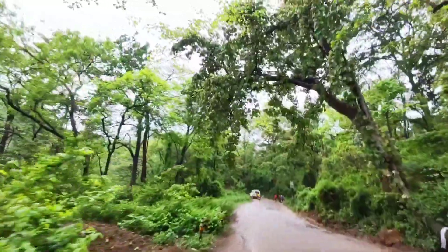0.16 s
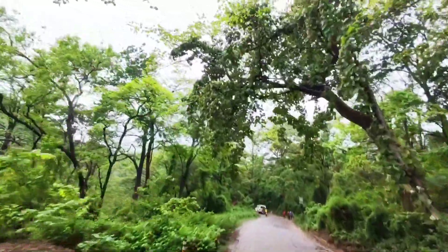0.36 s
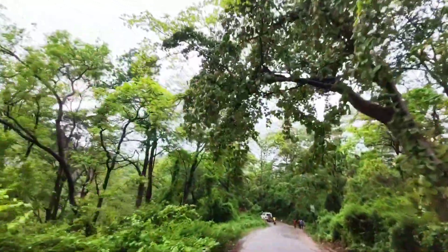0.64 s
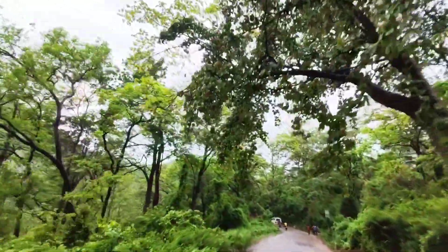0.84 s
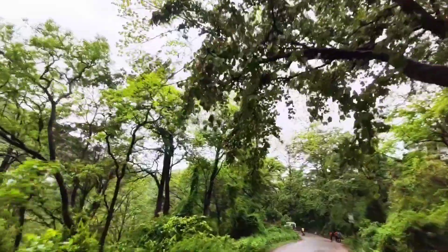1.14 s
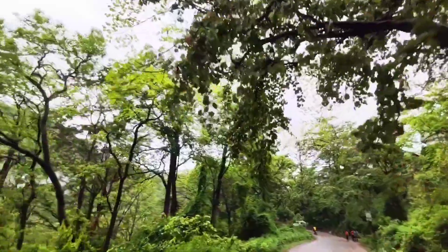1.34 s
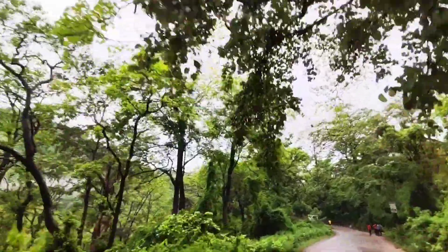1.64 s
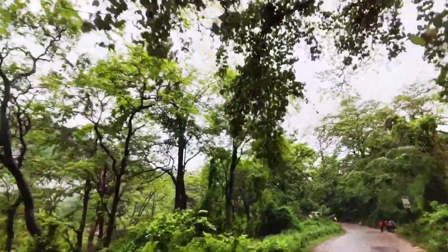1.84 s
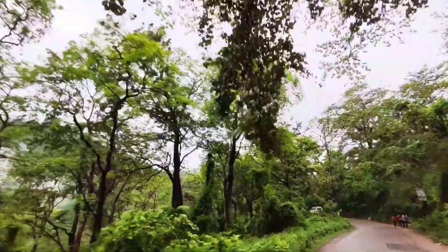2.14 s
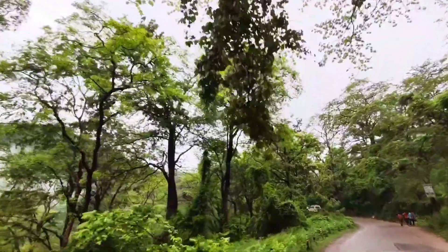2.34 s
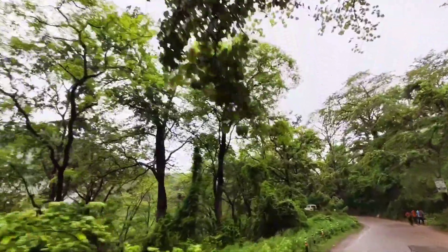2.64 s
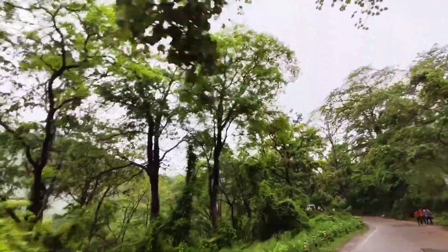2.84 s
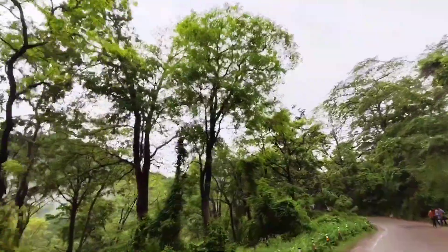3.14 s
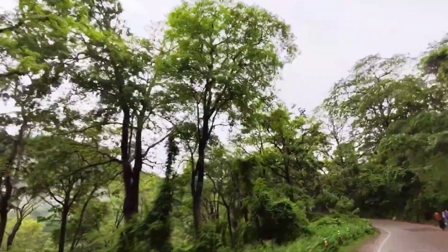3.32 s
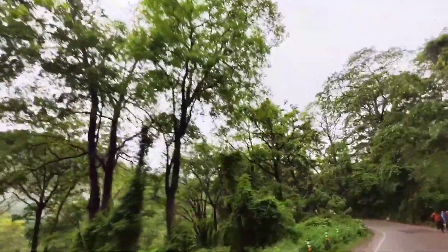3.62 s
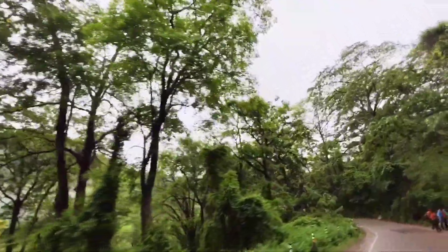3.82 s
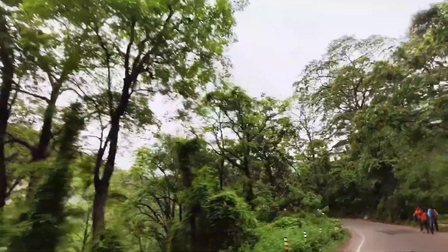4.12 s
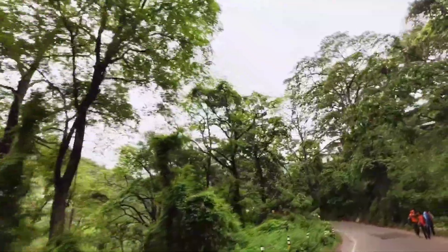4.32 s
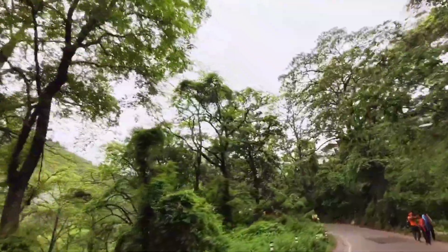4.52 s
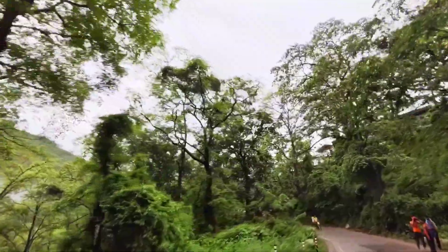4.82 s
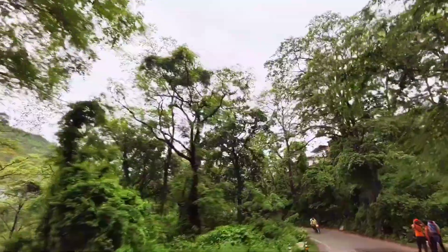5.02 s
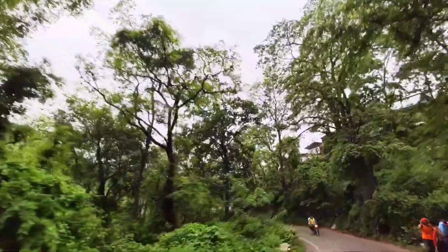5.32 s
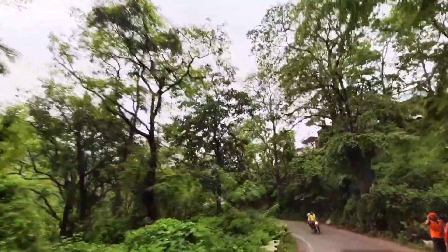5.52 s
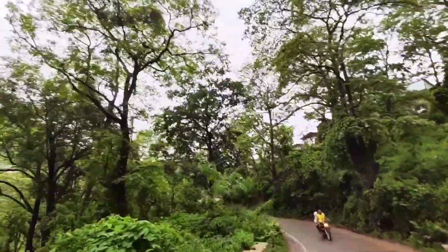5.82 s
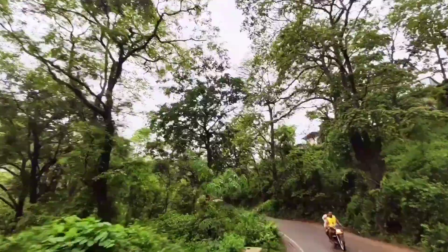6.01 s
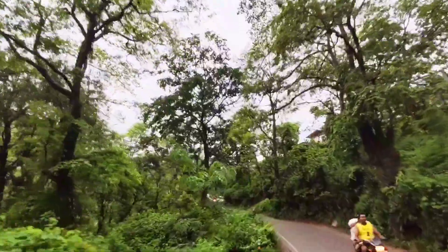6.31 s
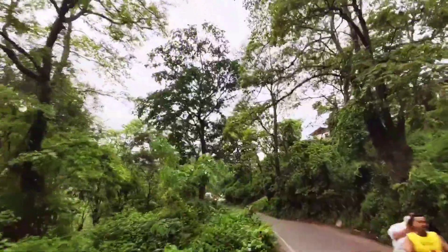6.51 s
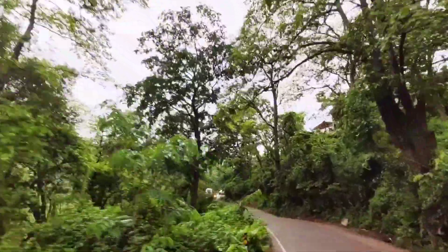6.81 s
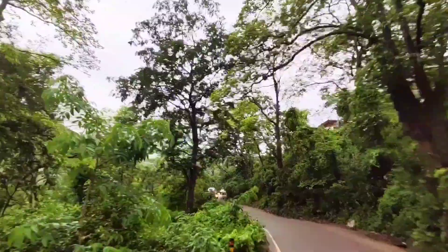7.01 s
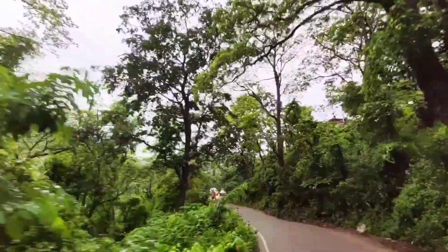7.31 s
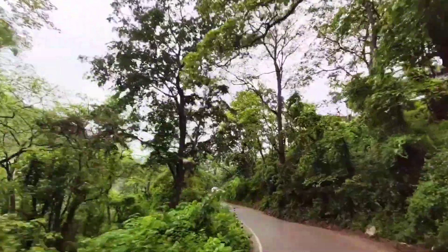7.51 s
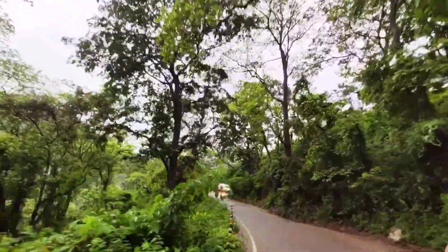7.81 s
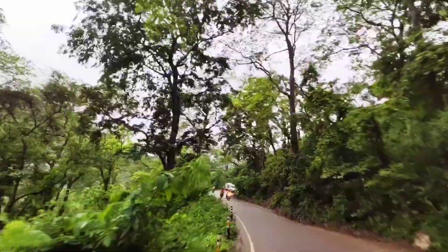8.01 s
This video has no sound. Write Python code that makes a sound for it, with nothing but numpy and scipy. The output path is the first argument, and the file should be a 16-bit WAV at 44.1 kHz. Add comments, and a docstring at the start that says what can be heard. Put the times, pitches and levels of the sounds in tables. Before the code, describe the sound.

Gusty wind buffets the microphone over a running scooter engine while an approaching motorbike toots repeatedly, and the scooter honks back.

```python
"""A scooter ride along a forest road. From the start, wind buffets two microphone ports over engine
clatter and gear whine that climbs with speed. An oncoming motorbike toots its electric disc horn,
faint at first, then closer, and the trees throw it back lower. Around 5.5 s the rider eases off and
lets it pass with two short toots. The throttle opens again through hard gusts, the intake rasps,
and at 7.8 s the scooter sounds its own horn, whose echoes come back higher."""
import sys
import numpy as np
from scipy import signal
from scipy.fft import rfft, irfft, next_fast_len
from scipy.io import wavfile
from scipy.ndimage import uniform_filter1d, minimum_filter1d

SR = 44100
rng = np.random.default_rng(int(sys.argv[2]) if len(sys.argv) > 2 else 0)


def int16_out(signal):
    """Quantize to a 16-bit WAV file."""
    q = np.round(np.clip(np.atleast_2d(signal).T, -1, 1) * 32767)
    wavfile.write(sys.argv[1], SR, q.astype(np.int16))


N = 359415
TIME = np.arange(N) / SR

# The steady bed of air: left port, then right port, in dB.
STEADY_AIR_DB = (-20.5, -21.5)
# Gusts and lulls. Each row: middle in seconds, half length in seconds, change in dB, port (0 left, 1 right).
GUSTS = [(0.29, 0.029, 10.5, 0), (0.573, 0.091, -8, 0), (1.495, 0.46, -3, 1), (1.563, 0.08, 3.5, 0),
         (2.495, 0.038, 4, 1), (2.598, 0.046, 3, 0), (4.02, 0.28, 2.5, 0), (3.85, 0.19, 4, 1),
         (4.207, 0.12, 5.5, 1), (4.563, 0.046, 9.5, 1), (4.929, 0.15, -8, 1), (5.411, .1, 13.5, 1),
         (5.679, 0.12, -11, 1), (6.04, 0.15, 1.5, 1), (6.142, 0.053, 4.5, 0), (6.436, 0.18, -7, 1),
         (6.457, 0.099, -5.5, 0), (6.942, .17, 11, 1), (7.06, 0.16, 9.5, 0), (7.542, 0.29, 2, 1),
         (7.628, 0.091, -3.5, 0), (8.06, 0.11, 5.5, 0), (7.96, 0.051, 3.5, 1)]
def airflow():
    """Strength of the air on each port in dB: steady, with gusts and lulls that swell and pass."""
    flow_db = np.outer(STEADY_AIR_DB, np.ones(N))
    for middle, half_length, db, port in GUSTS:
        flow_db[port] += db * np.exp(-np.abs((TIME - middle) / half_length) ** 3)
    return flow_db


# The low body of the wind. Each row: frequency in Hz, relative level in dB.
BUFFET_COLOUR = [(20, -35), (50, -35), (70, -20), (95, -4.5), (135, 2.5), (200, -4), (330, -4.5),
                 (450, -10), (700, -26), (1200, -32), (3000, -74)]
# The rasp of turbulence torn off by eddies. Each row: frequency in Hz, relative level in dB.
RASP_COLOUR = [(150, -11.5), (400, 0), (650, 1), (850, -7), (1300, -16.5), (5000, -53)]
def wind(airflow_db, trim_db=-0.5, flutter_db=3.0, rasp_db=-17, surge_db=1.43):
    """Turbulence surges and flutters on each port by itself; stronger swirls sound brighter."""
    ports = []
    for flow_db in airflow_db + surge_db * np.array([walk(13), walk(15)]):
        swirl = undb(flutter_db * walk(70))
        rasp = undb(rasp_db + .5 * (flow_db - np.mean(flow_db))) * unit(swirl ** 2) * noise(RASP_COLOUR)
        buffet = unit(swirl) * noise(BUFFET_COLOUR)
        ports.append(undb(flow_db + trim_db) * (buffet + rasp))
    return np.array(ports)


EDDY_S, EDDY_HZ = .017, 250.6  # length and pitch of a typical eddy
# The knock of a fast eddy. Each row: frequency in Hz, relative level in dB.
KNOCK_COLOUR = [(200, -1), (520, 3.5), (850, 2.5), (1600, -13), (3500, -44)]
# The hardest hits of air. Each row: middle in seconds, level in dB, pitch in Hz, port (0 left, 1 right).
HARD_EDDIES = [(.204, -9.5, 234, 0), (.282, -5, 220.4, 0), (.995, -16, 305, 0), (1.486, -11, 267, 0),
               (1.512, -7.5, 232, 0), (1.531, -2.5, 135, 0), (1.578, -11, 280, 0), (1.605, -5, 265, 0),
               (1.863, -2, 340.4, 0), (1.905, -9.5, 198, 0), (2.291, -5.5, 188, 0), (2.482, -6, 124, 1),
               (2.549, -13, 167, 1), (2.597, -11.5, 172.6, 0), (2.858, -10, 287, 0), (2.929, -8.5, 227, 0),
               (3.118, -8.5, 167.9, 0), (3.162, -10, 194, 0), (3.342, -3, 288.4, 0), (3.344, -11, 317.6, 1),
               (3.394, -10.5, 316.4, 1), (3.494, -9.5, 189, 0), (3.604, -8.5, 183, 1), (3.626, -6, 284, 0),
               (4.063, -8.5, 277.1, 0), (4.149, -9, 274, 1), (4.183, -9.5, 243.5, 0),
               (4.213, -10, 320.9, 1), (4.449, -8, 278, 0), (4.571, 0, 266.8, 1), (4.875, -9.5, 302.1, 0),
               (5.1, -6.5, 380, 0), (5.248, -10.5, 224, 0), (5.255, -10, 171.7, 1), (5.375, 0, 237.4, 1),
               (5.476, -8, 202.5, 1), (5.492, -9.5, 246.5, 0), (5.648, -21.5, 424, 0), (5.721, -11, 410, 0),
               (5.762, -9.5, 198, 0), (5.986, -10, 192, 0), (6.005, -13, 140, 1), (6.085, -6, 324.7, 0),
               (6.15, -12, 292.5, 1), (6.157, -7.5, 272, 0), (6.226, -10, 243.5, 0), (6.593, -13.5, 252, 0),
               (6.778, -4.5, 149.4, 0), (6.816, -4, 160, 1), (6.848, -1, 150, 1), (6.891, -2, 228, 1),
               (6.956, 1, 290.7, 1), (7.003, -6, 360, 1), (7.019, -13, 429, 0), (7.02, -13, 459, 1),
               (7.038, -4, 298.5, 0), (7.074, -2, 254, 1), (7.082, -7, 260, 0), (7.17, -1, 356.4, 0),
               (7.19, -7.5, 251, 0), (7.336, -9, 211.6, 0), (7.351, -10, 264, 1), (7.477, -12.5, 233, 0),
               (7.756, -6.5, 164.4, 1)]
def eddies(airflow_db, wander=0.5534, trail_db=-18, knock_db=-15, knock_half_s=0.0047):
    """Each eddy shakes one port for a few uneven cycles; faster ones knock and trail more turbulence."""
    out, rasp, burst = np.zeros((2, N)), noise(RASP_COLOUR), noise(KNOCK_COLOUR)
    bend = np.exp(wander * np.tanh(walk(650)) - wander ** 2 / 2)
    for middle, db, hz, port in HARD_EDDIES + chance_eddies(airflow_db):
        near = slice(max(int((middle - 2 * EDDY_S) * SR), 0), int((middle + 2 * EDDY_S) * SR))
        phase = rng.random() + np.cumsum(hz * bend[near]) / SR
        age = TIME[near] - middle
        swirl = np.sqrt(2) * np.sin(2 * np.pi * phase) * np.exp(-(age / (0.56 * EDDY_S)) ** 2)
        trail = rasp[near] * np.exp(-(age / (0.61 * EDDY_S)) ** 2) * undb(trail_db)
        knock = burst[near] * np.exp(-(age / knock_half_s) ** 2) * undb(knock_db)
        out[port, near] += undb(db) * (swirl + (trail + knock) * (hz / EDDY_HZ) ** 3.06)
    return out


def chance_eddies(airflow_db, count=50, pitch_spread=0.34):
    """Rows for weaker eddies that come by chance, each as strong as the air on its port."""
    rows = []
    for when, pitch, side in rng.random((count, 3)):
        at, port = int(when * N), int(side > .5)
        hz = EDDY_HZ * np.exp(pitch_spread * (2 * pitch - 1))
        rows.append((TIME[at], airflow_db[port, at], hz, port))
    return rows


# The horn's timbre; skipped harmonics lie in between. Each row: harmonic number, relative level in dB.
HORN_HARMONICS = [(1, -25), (3, -44), (7, -44), (8, -21.5), (9, -1), (10, -38), (12, -64), (13, -34.5),
                  (14, -49), (18, -70), (21, -48), (22, -39), (23, -31.5), (24, -46), (26, -48), (28, -46),
                  (33, -52)]
def horn_cycle(size=2048, leaf_loss_db=0.4):
    """One cycle each of ring, buzz and dulled buzz: the armature strikes its pole, the disc rings."""
    turn = np.arange(size) / size
    multiples, levels = np.transpose(HORN_HARMONICS)
    orders = np.arange(1, 37)
    gains = undb(np.interp(orders, multiples, levels))
    partials = gains[:, None] * np.sin(2 * np.pi * orders[:, None] * turn)
    ring = np.argmax(gains)  # the disc's note, the ninth harmonic
    disc = partials[ring]
    # Leaves swallow more of each harmonic above the disc's.
    through_leaves = undb(-leaf_loss_db * np.maximum(orders - orders[ring], 0))
    return disc, partials.sum(axis=0) - disc, through_leaves @ partials - disc


# Bright hiss for horn sizzle, tyres and air. Each row: frequency in Hz, relative level in dB.
HISS_COLOUR = [(2000, 5), (4000, 6.5), (5500, 5), (6600, -1), (7400, -19), (8300, -2.5), (9500, 1.5),
               (10800, -1), (11900, 3), (14400, -5)]
# Bushes on the bend screen the motorbike for a moment. Each row: time in seconds, gain in dB.
BUSH_SCREEN = [(5.02, 0), (5.12, -4.5), (5.23, -4.5), (5.3, 0)]
# Six toots from the motorbike, then the scooter's own. Each row: start and end in seconds, pitch in Hz,
# swell in seconds, direct level in dB, tree echo in dB, sizzle in dB against the direct sound,
# Doppler ratio of far echoes, left minus right in dB, buzz in dB, growth in dB per second,
# flutter in dB, hillside echo in dB.
TOOTS = [ (-.3, .38, 428.5, .05, -47, -42.5, -26, .968, -7, -3, 5, 4, -46),
         (.65, 1.5, 445, .1, -53, -45, -26, .972, -6, -3, 0, 4, -50),
         (1.91, 2.86, 428.6, .022, -34, -33.5, -19, .963, -4, -2, -1, 4, -39),
         (4.508, 5.705, 431.3, .008, -23.6, -27.8, -29, .96, -2, -2.5, 1.2, 2.2, -38),
         (5.917, 6.095, 432.7, .005, -18, -23.5, -22, .96, -1, 4.5, -14, 2, -33),
         (6.208, 6.42, 431.8, .004, -23.3, -24, -16, .964, -2, 7, 12, 2.3, -33),
         (7.812, 8.3, 392, .002, -31, -21.5, -10, 1.047, -7, 2, -6, 3, -33), ]
def horns(trees=48, far_s=.4, echo_t60=1.5, bend_s=.05, scatter=.008, hillside_s=.09,
          creep_hz_per_s=1.9, release_s=0.0045, rattle_db=8):
    """Electric disc horns; trees and hillside return each toot late, dull and Doppler-shifted."""
    disc, buzz, dull_buzz = horn_cycle()
    rattle = unit(undb(rattle_db * np.tanh(walk(130))))
    waver = 1 + .0003 * walk(40) + 0.0026 * walk(900)
    drift = 0.002507 * walk(16)
    out, hiss = np.zeros((2, N)), np.array([noise(HISS_COLOUR), noise(HISS_COLOUR)])

    def toot(start, end, hz, swell, growth, rasp, port_phases, echo=True):
        """Span and sound of one toot: it starts sharp, settles, creeps up and rings out; echoes drift."""
        span = slice(int(np.clip(start * SR, 0, N)), int(np.clip((end + 0.057) * SR, 0, N)))
        age = np.maximum(TIME[span] - start, 0)
        shift = waver[span] + echo * drift[rng.integers(N // 2):][:len(age)]
        settle = 1 + 0.0071 * np.exp(-age / 0.012)
        phase = np.cumsum((hz + creep_hz_per_s * age) * shift * settle) / SR
        attack = np.sqrt(1 - np.exp(-age / (2 * swell)))
        release = np.exp(-np.maximum(TIME[span] - end, 0) / release_s)
        place = (np.add.outer(port_phases, phase) * len(disc)).astype(int) % len(disc)
        tone = (disc[place] + rattle[span] * rasp[place]) / np.std(disc)
        return span, attack * release * undb(growth * age) * tone

    def flutter(db):
        """Fading at the two ports as trunks and leaves go by."""
        return unit(undb(db * (np.array([walk(24), walk(21)]) + walk(15)) / np.sqrt(2)))

    for (start, end, hz, swell, direct_db, echo_db, sizzle_db, doppler,
         side_db, buzz_db, growth, flutter_db, hillside_db) in TOOTS:
        heard = np.zeros((2, N))
        near_buzz, far_buzz = buzz * undb(buzz_db), dull_buzz * undb(buzz_db / 2)
        span, direct = toot(start, end, hz, swell, growth, near_buzz, [0, .025], echo=False)
        sizzle = np.abs(direct) * hiss[:, span] * undb(sizzle_db)
        heard[:, span] += (direct * flutter(flutter_db)[:, span] + sizzle) * undb(direct_db)
        span, slap = toot(start + hillside_s, end + hillside_s, hz * doppler,
                          swell, growth, far_buzz, [0, .01])
        heard[:, span] += slap * undb(hillside_db) * flutter(flutter_db)[:, span]
        # Later tree echoes are fainter and take more of the Doppler shift.
        lags = 0.027 + far_s * ((np.arange(trees) + rng.random(trees)) / trees) ** 1.4
        gains = undb(-60 * lags / echo_t60)
        gains = gains / np.linalg.norm(gains) * undb(echo_db)
        for lag, gain, (detune, *phases) in zip(lags, gains, rng.standard_normal((trees, 3))):
            ratio = 1 + (doppler - 1) * (1 - np.exp(-lag / bend_s)) + scatter * detune
            span, reflection = toot(start + lag, end + lag, hz * ratio, swell, growth, far_buzz, phases)
            heard[:, span] += gain * reflection
        out += heard * pan(side_db)
    return out * undb(curves(BUSH_SCREEN)[0])


# The ride: speeding up, easing off, opening the throttle again.
# Each row: time in seconds, gear mesh pitch in Hz, engine load in dB (near 0 at full throttle).
RIDE = [(0, 930, 0.5), (.5, 935.7, 0), (1.3, 971.7, 0), (1.75, 977, -0.5), (2.05, 1014, 0),
        (2.55, 1039, -1), (3.0, 1080, 0), (3.15, 1088, -1), (3.75, 1142, -0.5), (4.6, 1161, -2.5),
        (5.35, 1178, -5), (5.65, 1148, -11.5), (6.15, 1119, -8.5), (6.35, 1113, -8), (6.7, 1107, -3),
        (7.2, 1124, -1.5), (7.6, 1153, -0.5), (7.85, 1152, 0.5), (8.15, 1134, -4)]
# The fader for exhaust drone and gear tone. Each row: time in seconds, relative level in dB.
HUM_FADER = [(0, 1), (.7, -3), (1.6, -6), (2.8, -3.5), (3.6, 0), (4.3, 2), (5.2, -2), (5.65, -12.5),
             (6.3, -14), (6.8, -3.5), (8.15, -7)]
# The engine's clatter. Each row: frequency in Hz, relative level in dB.
CLATTER_COLOUR = [(200, 9), (500, -4), (800, 5), (1020, 3.5), (1150, 7.5), (1300, 6), (1650, 2.5),
                  (2000, 5), (2500, -1), (3200, -1.5), (3900, -1), (4400, -14), (5700, -10), (6600, -15.5),
                  (7400, -25.5), (14000, -38)]
def engine(mesh_hz, load_db, hum_db, clatter_db=-29.0, pipe_db=-29.5, pipe_hz=322, thud_db=-36.5):
    """One cylinder: clatter swells with each firing and with load; the exhaust thuds and drones."""
    firing_hz = mesh_hz / 25
    cycle = 2 * np.pi * np.cumsum(firing_hz * (1 + 0.00671 * walk(24.96))) / SR
    pulse = unit(1 + 0.047 * np.cos(cycle) * undb(3.0 * walk(45)))
    clatter = spread(lambda: noise(CLATTER_COLOUR), shared=0.18) * pulse
    clatter *= undb(clatter_db + 0.94 * load_db + 1.42 * walk(12))
    # The pipe lifts whichever firing harmonic comes near its resonance.
    orders = np.arange(2, 11)
    drone = unit(sum(np.sin(k * cycle) / (1 + ((k * firing_hz - pipe_hz) / 17) ** 2) for k in orders))
    thud = unit(sum(np.sin(k * cycle) / k for k in orders))
    exhaust = drone * undb(pipe_db + hum_db) + thud * undb(thud_db + load_db)
    return clatter * pan(-3.0) + exhaust * undb(2 * walk(30)) * pan(0.58)


# The fader for the gear tone's octave. Each row: time in seconds, level in dB before the case's lift.
OCTAVE_FADER = [(0, -38), (.6, -41.5), (1.1, -36), (1.35, -42), (1.8, -39), (2.35, -37), (2.85, -41.5),
                (3.3, -36.5), (4, -43), (4.6, -40.5), (5.3, -49), (5.6, -57), (6.2, -61), (6.3, -48),
                (6.65, -40), (7, -46.5), (7.65, -36), (8.15, -40.5)]
# Weaker whines of belt, chain and fan. Each row: multiple of the mesh pitch, relative level in dB.
SIDE_WHINES = [(1.1, -10.5), (1.55, -4.5), (1.69, -15.5)]
def gears(mesh_hz, load_db, hum_db, mesh_db=-45, whines_db=-40.0, wobble=0.00604):
    """Meshing teeth whine, loudest where the case rings; belt flutter roughens the tone and its octave."""
    hz = mesh_hz * (1 + wobble * walk(110))
    mesh = spread(lambda: whine(hz, blur=0.79), shared=0.79)
    mesh *= case_gain(mesh_hz) * undb(mesh_db + 1.04 * hum_db)
    octave = spread(lambda: whine(2 * hz, blur=1.24, flutter_db=2.5), shared=0.51)
    octave *= case_gain(2 * mesh_hz) * undb(curves(OCTAVE_FADER)[0])
    others = sum(undb(db) * spread(lambda: whine(k * hz, blur=1.76), shared=0.15) for k, db in SIDE_WHINES)
    return mesh * pan(4.9) + octave * pan(-4.5) + others * undb(whines_db + load_db) * pan(-10.0)


# Where the gear case rings. Each row: centre in Hz, half width in Hz, lift in dB.
CASE_RESONANCES = [(1138, 35, 9), (2078, 26, 6.5)]
def case_gain(hz):
    """How much the gear case lifts a tone that passes its resonances."""
    return undb(sum(db / (1 + ((hz - centre) / width) ** 2) for centre, width, db in CASE_RESONANCES))


# A thin whine that sags, climbs and fades. Each row: time in seconds, pitch in Hz, level in dB.
THIN_WHINE_PATH = [(0, 2850, -38), (.25, 2764, -46), (.6, 2735, -41), (1.0, 2900, -47), (1.8, 3000, -45),
                   (2.2, 3000, -47), (2.7, 3060, -70)]
def thin_whine():
    """A rough high tone from the drive as the scooter gathers speed, mostly on the right."""
    hz, db = curves(THIN_WHINE_PATH)
    return spread(lambda: whine(hz, blur=1.9), shared=.3) * undb(db) * pan(-7)


# The rasp of the opening throttle. Each row: time in seconds, level in dB, resonance in Hz.
INTAKE_SWEEP = [(7.3, -75, 2615), (7.6, -42, 2770), (7.76, -33.5, 2960), (8.15, -34.5, 3100)]
def intake(width_hz=750):
    """Air drawn past the throttle: a broad resonance that climbs."""
    db, hz = curves(INTAKE_SWEEP)
    phase = 2 * np.pi * np.cumsum(hz) / SR
    rasp = spread(lambda: walk(width_hz) * np.sin(phase) + walk(width_hz) * np.cos(phase), shared=0.12)
    return rasp * undb(db) * pan(-3)


# The wheels drop over bumps. Each row: start in seconds, relative level in dB.
BUMPS = [(1.51, -18), (2.457, -13), (3.102, -15), (4.535, -15), (5.948, -10)]
def bumps(hz=80, rise_s=0.014, trim_db=-3, wander=.25):
    """Each bump shakes the frame for a few slow, dull cycles."""
    swing = np.sin(2 * np.pi * np.cumsum(hz * np.exp(wander * walk(120))) / SR)
    return swing * sum(undb(db + trim_db) * np.exp(-((TIME - s) / rise_s - 1) ** 2) for s, db in BUMPS)


# The low end of the wheels. Each row: frequency in Hz, relative level in dB.
RUMBLE_COLOUR = [(20, 0), (45, -16), (68, 12.5), (110, 6.5), (250, -36.5)]
# The rumble follows the road surface. Each row: time in seconds, level in dB.
RUMBLE_FADER = [(0, -41), (1.3, -43), (2.2, -32), (3, -34), (3.8, -26.5), (5.8, -29.5), (6.5, -40),
                (8.15, -29)]
def road(uneven_db=5.5):
    """Low, uneven rumble of the wheels, carried up through the frame."""
    rumble = spread(lambda: noise(RUMBLE_COLOUR), shared=0.1)
    return rumble * undb(curves(RUMBLE_FADER)[0] + uneven_db * np.tanh(walk(12)))


def rush(load_db, airflow_db, tyres_db=-51, pull_db=-42, gust_db=-29):
    """Smooth hiss: tyres all along, more on the right as the scooter pulls, and air in hard gusts."""
    pull = undb(pull_db + 2.0 * load_db) * pan(-15)
    gain = np.sqrt(undb(tyres_db) ** 2 + pull ** 2 + undb(gust_db + airflow_db) ** 2)
    return gain * np.array([noise(HISS_COLOUR) * undb(.5 * walk(23)) for _ in range(2)])


def whine(hz, blur, flutter_db=3.5):
    """A fluttering tone whose phase wanders by blur radians."""
    phase = 2 * np.pi * np.cumsum(hz) / SR
    return unit(np.sin(phase + blur * walk(70)) * undb(flutter_db * walk(60)))


def noise(colour):
    """Noise at rms 1, shaped by (Hz, dB) points."""
    hz, db = np.transpose(colour)
    size = next_fast_len(N)
    bins_hz = np.arange(size // 2 + 1) * SR / size
    gains = undb(np.interp(np.log(bins_hz + 1), np.log(hz), db))
    return unit(irfft(rfft(rng.standard_normal(size)) * gains, size)[:N])


def walk(rate):
    """A random wobble at rms 1: levels held for 1 / rate seconds and smoothed twice."""
    hold = max(int(SR / rate), 2)
    steps = np.repeat(rng.standard_normal(N // hold + 1), hold)
    return unit(uniform_filter1d(uniform_filter1d(steps, hold), hold)[:N])


def spread(source, shared):
    """Two channels that have a share of the source in common."""
    return np.sqrt(shared) * source() + np.sqrt(1 - shared) * np.array([source(), source()])


def pan(db):
    """Left and right gains, with the left louder by db."""
    return undb(np.array([[1], [-1]]) * db / 2)


def curves(table):
    """Each column after the time column as an automation curve."""
    seconds, *columns = np.transpose(table)
    return [np.interp(TIME, seconds, column) for column in columns]


def undb(db):
    """Decibels to gain."""
    return 10 ** (np.asarray(db) / 20)


def unit(x):
    """Scale to rms 1."""
    return x / np.sqrt(np.mean(x ** 2))


def scene():
    """Wind, scooter and horns as they reach the two ports."""
    mesh_hz, load_db = curves(RIDE)
    hum_db, = curves(HUM_FADER)
    airflow_db = airflow()
    drive = engine(mesh_hz, load_db, hum_db) + gears(mesh_hz, load_db, hum_db) + thin_whine() + intake()
    wheels = road() + spread(bumps, shared=0.33)
    return wind(airflow_db) + eddies(airflow_db) + horns() + drive + wheels + rush(load_db, airflow_db)


def record(dry, ceiling=0.93, window=441, top_hz=14330):
    """A limiter holds down the hardest gusts, then a steep low-pass cuts the top."""
    needed = ceiling / np.maximum(np.abs(dry), ceiling)
    gain = uniform_filter1d(minimum_filter1d(needed, window), window)
    lowpass = signal.ellip(10, .2, 80, top_hz, fs=SR, output="sos")
    return signal.sosfilt(lowpass, dry * gain, axis=-1)


dry = scene()
out = record(dry)
int16_out(out)
```